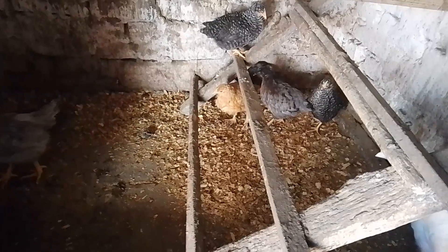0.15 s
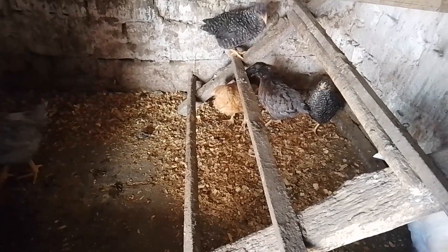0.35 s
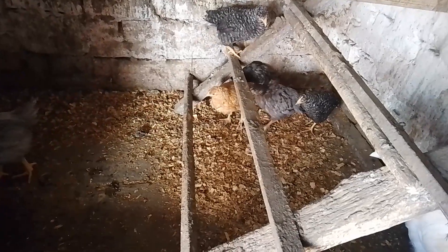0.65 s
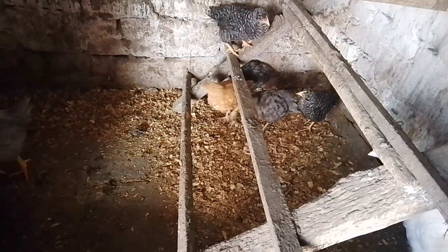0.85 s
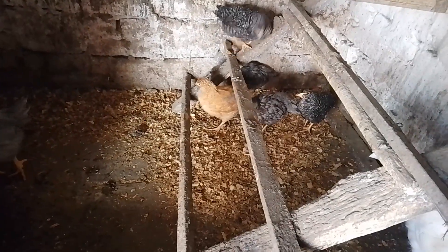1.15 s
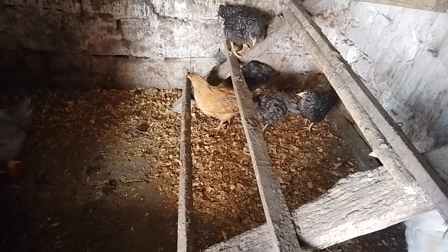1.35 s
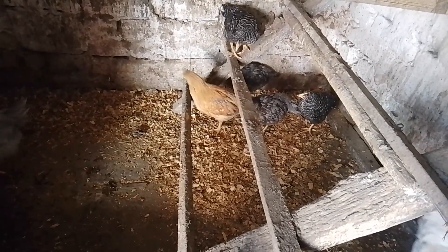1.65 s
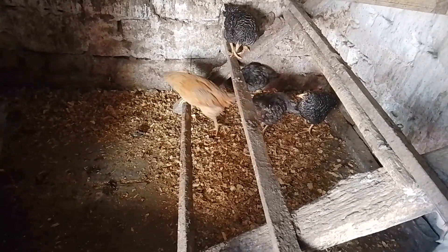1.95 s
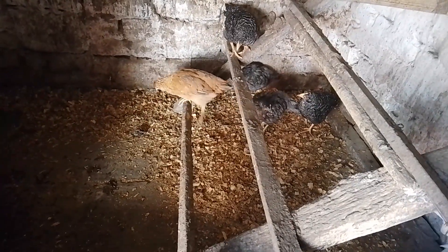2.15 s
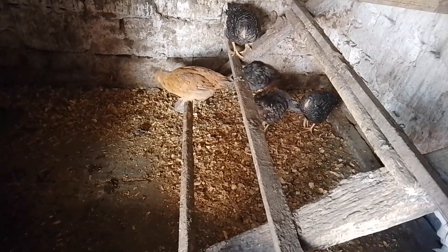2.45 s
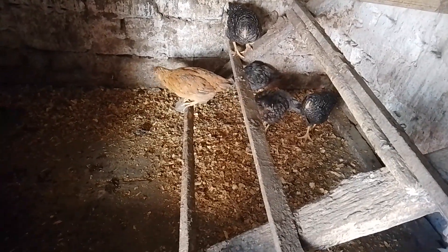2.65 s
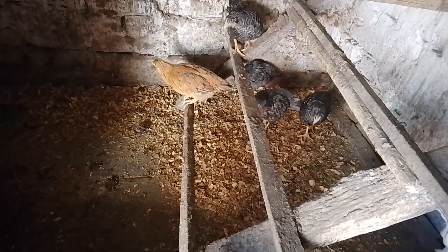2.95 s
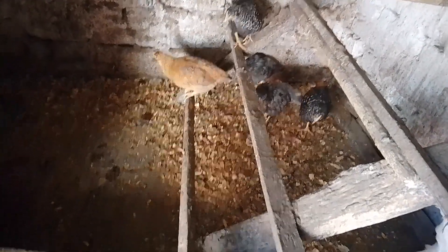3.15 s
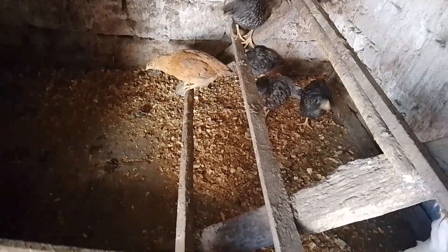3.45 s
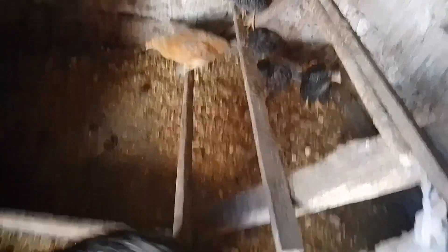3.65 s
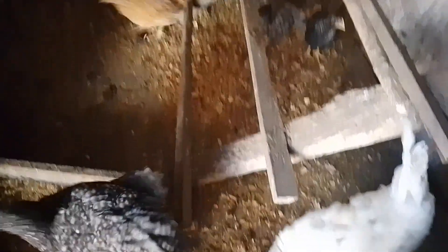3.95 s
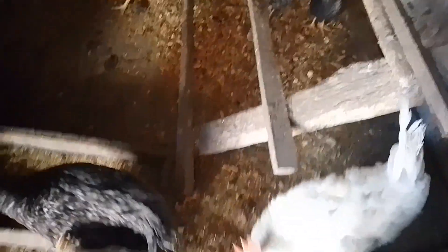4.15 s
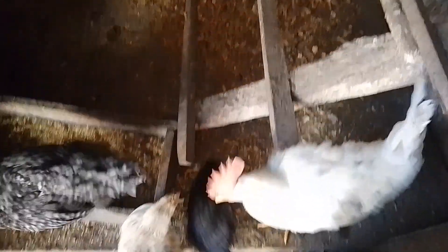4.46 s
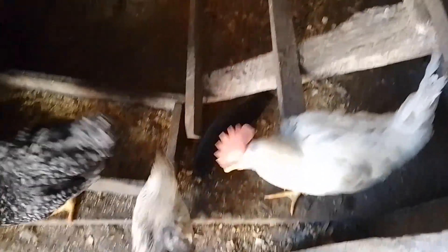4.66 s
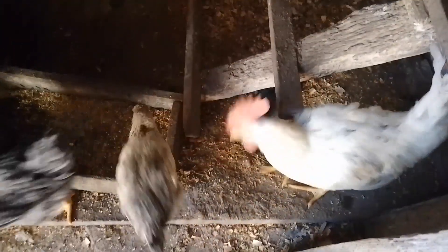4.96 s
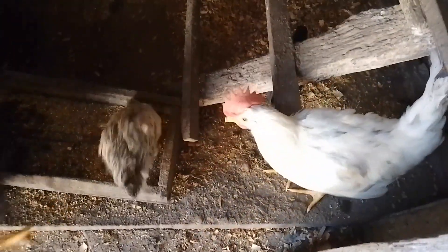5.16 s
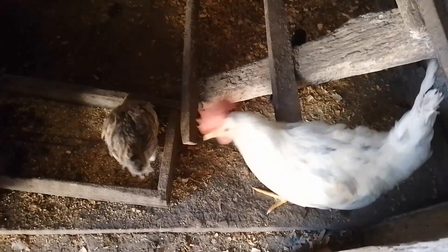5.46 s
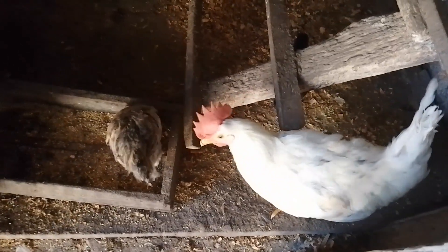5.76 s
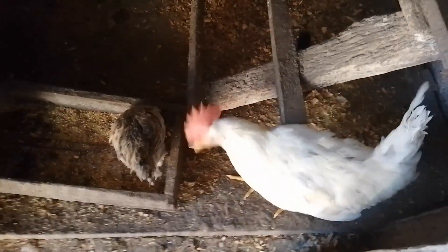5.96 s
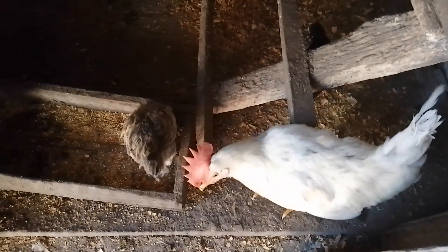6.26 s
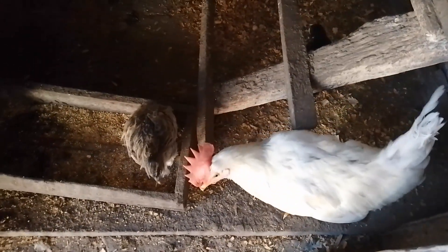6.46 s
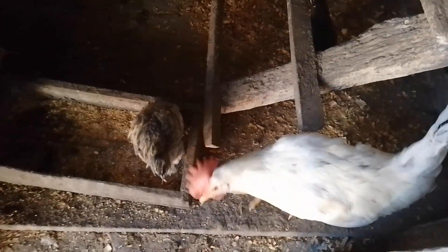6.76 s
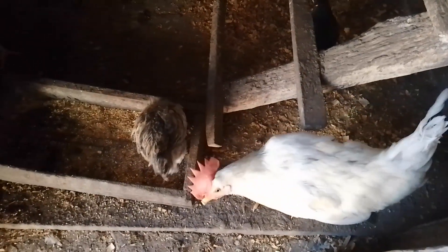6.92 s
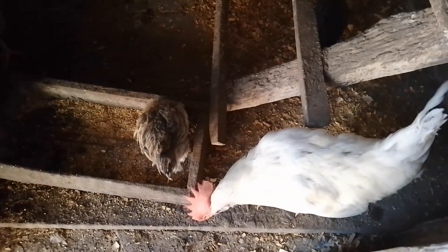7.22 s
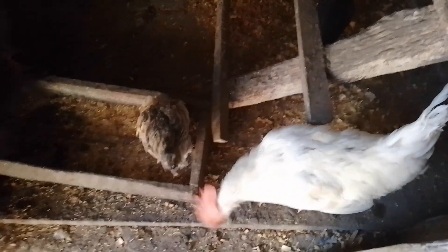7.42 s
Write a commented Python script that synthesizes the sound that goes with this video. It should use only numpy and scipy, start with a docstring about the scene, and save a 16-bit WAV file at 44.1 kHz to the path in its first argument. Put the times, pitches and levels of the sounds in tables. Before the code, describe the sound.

High falling chick peeps over scratching and wooden knocks, while hens brush past with swishing wings and step on a wooden trough.

```python
"""Chicks peep in a small stone coop, with one trill at 0.2 s; each call is a sliding near-sine from the
syrinx. Beaks and feet knock on boards and scratch the litter throughout. From 3.4 s a hen holds a thin
whine while feathers rustle and wings swish as the hens push past. From 4.2 to 4.8 s feet ring a wooden
feed trough and the peeps are loudest. Two hollow bumps come near 5.9 s, then more peeps and scratching,
and a brief high sizzle at 7.5 s."""
import sys
import numpy as np
from scipy import signal
from scipy.fft import rfft, irfft, next_fast_len
from scipy.io import wavfile

SR = 44100
rng = np.random.default_rng(int(sys.argv[2]) if len(sys.argv) > 2 else 0)


def to_wav(sig):
    """Store sig (one row per channel, or 1-D mono) as 16-bit WAV at the path in sys.argv[1].

    Samples outside -1..1 are clipped; the rate is SR.
    """
    pcm = np.clip(np.atleast_2d(sig), -1, 1) * 32767
    pcm = np.round(pcm).astype(np.int16)
    wavfile.write(sys.argv[1], SR, pcm.T)  # frames by channels


N = 334719
TIME = np.arange(N) / SR


def from_db(db):
    """Decibels to gain."""
    return 10 ** (np.asarray(db) / 20)


def unit_rms(x):
    """Scale to unit power."""
    return x / np.sqrt(np.mean(x ** 2) + 1e-20)


def curve(rows):
    """Interpolate (seconds, value) rows at every sample."""
    return np.interp(TIME, *np.transpose(rows))


def band(x, hz, kind, order=2):
    """Butterworth filter."""
    return signal.sosfilt(signal.butter(order, np.clip(hz, 10, .45 * SR), kind, fs=SR, output="sos"), x)


def drift(rate_hz, size):
    """Random wander of unit spread, rate_hz new values a second."""
    steps = rng.standard_normal(size // 16 + 2)
    return np.sqrt(3 / 2) * np.interp(np.arange(size) * rate_hz / SR, np.arange(len(steps)), steps)


def panned(x, pan_db):
    """Mono to stereo; pan_db is left over right."""
    return x * from_db([[pan_db / 2], [-pan_db / 2]])


def add(out, start_s, x):
    """Mix x in at start_s."""
    at = round(start_s * SR)
    out[..., at:at + x.shape[-1]] += x[..., :max(N - at, 0)]


def coloured(x, spectrum):
    """Filter x by (Hz, dB) rows."""
    hz, db = np.transpose(spectrum)
    size = next_fast_len(N + SR // 2)
    bins_hz = np.fft.rfftfreq(size, 1 / SR)
    gain = from_db(np.interp(np.log(bins_hz + 1), np.log(hz), db, left=-90))
    return irfft(rfft(x, size) * gain, size)[..., :N]


def noise(spectrum, width):
    """Coloured stereo noise; width is side over mid."""
    mid, side = band(coloured(rng.standard_normal((2, N)), spectrum), spectrum[-1][0] * 1.2, "low")
    return unit_rms(mid) + width * unit_rms(side) * [[1], [-1]]


# Echoes off walls and floor. Each row: delay in seconds, relative level in dB, pan in dB.
WALL_ECHOES = [(.0031, -12, 18), (.0058, -5, -22.5), (.0094, -5, 6), (0.0135, -24, -21)]


def coop(x, echo_db, tail_db, width, t60_s=0.17, lag_s_per_db=.00003):
    """Echoes off the near walls reach the farther microphone later; a short diffuse tail follows."""
    t = np.arange(SR // 2) / SR
    envelope = from_db(-60 * t / t60_s) * (1 - np.exp(-t / 0.0036))
    mid, side = band(rng.standard_normal((2, len(t))), 5340, "low") * envelope
    response = (mid + width * side * [[1], [-1]]) / np.sqrt(np.sum(mid ** 2)) * from_db(tail_db)
    for delay_s, db, pan_db in WALL_ECHOES:
        for channel, sign in enumerate([1, -1]):
            at = round((delay_s - sign * pan_db * lag_s_per_db / 2) * SR)
            response[channel, at] += from_db(db + echo_db + sign * pan_db / 2)
    return x + signal.fftconvolve(np.atleast_2d(x), response, axes=1)[:, :N]


# Floor rumble. Each row: time in seconds, level in dB before gain.
RUMBLE_LEVELS = [(0.0, -68.5), (0.89, -72), (2.75, -71), (4.44, -60), (4.65, -55), (4.9, -64),
                 (5.79, -67.5), (6.38, -66), (6.64, -63.5), (7.59, -67)]
# Each row: frequency in Hz, density in dB.
RUMBLE_SPECTRUM = [(20, -30), (42, 4), (70, -4.5), (120, 3), (170, -2.5), (300, -24), (700, -52)]


def floor_rumble(gain_db=3.5):
    """The floor rumbles under the birds."""
    return from_db(curve(RUMBLE_LEVELS) + gain_db + 0.5 * drift(12, N)) * noise(RUMBLE_SPECTRUM, width=0.17)


# Closing sizzle. Each row: time in seconds, level in dB.
SIZZLE_LEVELS = [(7.43, -90), (7.49, -61), (7.52, -59), (7.53, -50), (7.59, -58)]
# Each row: frequency in Hz, density in dB.
SIZZLE_SPECTRUM = [(9000, -32), (10500, -10), (11700, 3), (12800, 5), (14000, -19)]


def sizzle():
    """A brief flickering hiss near 12 kHz."""
    envelope = from_db(curve(SIZZLE_LEVELS) + 4.1 * drift(246.6, N)) * (TIME > SIZZLE_LEVELS[0][0])
    return envelope * noise(SIZZLE_SPECTRUM, width=0.11)


# How busy the feet are. Each row: time in seconds, level in dB before gain.
FOOTWORK_LEVELS = [(0.0, -68), (0.63, -65.5), (0.78, -62), (0.93, -65.5), (1.58, -67), (1.82, -66.5),
                   (3.19, -68), (3.63, -60.5), (3.83, -66), (4.12, -57.5), (4.44, -53), (4.65, -48),
                   (4.75, -56), (5.71, -66), (6.32, -64.5), (6.53, -62.5), (6.89, -66.5), (7.59, -65.5)]
# Scuffing feet and cracking litter. Each row: frequency in Hz, density in dB.
SCUFF_SPECTRUM = [(150, 1), (250, 10), (400, 3), (560, 4), (800, 1), (1500, -2), (2500, -5), (5000, -27.5),
                  (9000, -20)]
CRACK_SPECTRUM = [(300, -12), (700, 3), (1600, -1), (3000, -3), (6000, 3), (14000, -28)]


def footwork(scuff_gain_db=1, crack_gain_db=-2.5, crack_t60_s=0.048):
    """Feet scuff; straw and grain give way in tiny dry cracks, more often as the feet get busier."""
    feet_db = curve(FOOTWORK_LEVELS)
    scuffs = from_db(feet_db + scuff_gain_db + 2 * drift(90, N)) * noise(SCUFF_SPECTRUM, width=0.56)
    cracks_per_s = 34 * from_db(feet_db + 63)
    onsets = rng.random(N) < cracks_per_s / SR
    sizes = from_db(feet_db + crack_gain_db + 3 * np.clip(rng.standard_normal(N), -2, 2))
    envelope = signal.lfilter([1], [1, -from_db(-60 / (crack_t60_s * SR))], onsets * sizes + 1e-18)
    return scuffs + envelope * noise(CRACK_SPECTRUM, width=0.96)


# Feathers brushing. Each row: time in seconds, level in dB before gain.
RUSTLE_LEVELS = [(0.0, -73.5), (0.19, -69.5), (0.38, -75), (0.59, -79), (0.76, -68), (1.54, -82),
                 (2.07, -78), (2.54, -88), (3.68, -72.5), (3.87, -56), (4.27, -64.5), (4.59, -59),
                 (4.99, -75.5), (5.62, -82), (6.19, -80), (6.57, -64), (6.89, -81), (7.59, -83)]
# Wing passes. Each row: peak time in seconds, half length in seconds, level in dB.
WING_PASSES = [(3.75, 0.093, -53.5), (3.94, 0.084, -52), (4.104, 0.2, -68.5), (4.672, 0.075, -55),
               (6.584, 0.27, -62.5)]
# Rustle and swish. Each row: frequency in Hz, density in dB.
RUSTLE_SPECTRUM = [(1200, -14), (2500, 1.5), (4000, 9.5), (6000, 11), (7500, 2.5), (10000, -3.5),
                   (14000, -9)]
SWISH_SPECTRUM = [(3000, 7), (7000, -4), (11000, 5.5), (14000, 8.5)]


def feathers(rustle_gain_db=7.5, hiss_db=-74.5):
    """Feathers rustle, more unevenly when busy; wings slide past over a faint high hiss."""
    rustle_db = curve(RUSTLE_LEVELS)
    unevenness = np.interp(rustle_db, [-81, -67], [.3, 1])
    gust_db = unevenness * (2.9 * drift(30, N) + 1.24 * drift(330, N))
    rustle = from_db(rustle_db + rustle_gain_db + gust_db) * noise(RUSTLE_SPECTRUM, width=0.49)
    wings = sum(from_db(db) * np.maximum(1 - ((TIME - peak_s) / half_s) ** 2, 0)
                for peak_s, half_s, db in WING_PASSES)
    swish = (from_db(hiss_db) + wings) * from_db(gust_db / 2) * noise(SWISH_SPECTRUM, width=0.59)
    return rustle + swish


# Strokes in the litter. Each row: start in seconds, level in dB, T60 in seconds.
SCRATCH_STROKES = [(.008, -57.5, .2), (.21, -61, 0.76), (.583, -53, 0.27), (1.067, -55, 0.15),
                   (2.024, -64.5, 0.12), (2.541, -51.5, 0.031), (3.05, -60, 0.059), (4.39, -42.5, 0.41),
                   (4.485, -43.5, 0.17), (4.694, -44, .08), (4.89, -50, 0.28), (5.061, -58, 0.3),
                   (5.228, -48.5, 0.28), (5.36, -64.5, 0.15), (5.594, -56.5, 0.053), (5.943, -49, 0.15),
                   (6.351, -48.5, 0.18), (6.396, -40, 0.06), (6.573, -46.5, 0.42), (6.724, -59, 0.096),
                   (6.858, -58.5, 0.15)]


def scratches(swell_s=0.0066, crunch_db=3.5):
    """Claws and beaks crunch through straw and grain."""
    force, t = np.zeros(N), np.arange(SR // 2) / SR
    attack = np.minimum(t / swell_s, 1)
    for start_s, db, t60_s in SCRATCH_STROKES:
        add(force, start_s, attack * from_db(db - 60 * np.maximum(t - swell_s, 0) / t60_s))
    hiss = band(rng.standard_normal(N), [3000, 7000], "band", order=1)
    return force * unit_rms(hiss * from_db(-crunch_db * drift(700, N)))


def ring_modes(blows, modes):
    """A soft foot feeds the modes for as long as the contact lasts; then they ring out."""
    out, t = np.zeros(N), np.arange(SR // 2) / SR
    for start_s, db, contact_s, overtone_db in blows:
        for k, (hz, mode_db, t60_s) in enumerate(modes):
            envelope = np.minimum(t / contact_s, 1) * from_db(-60 * np.maximum(t - contact_s, 0) / t60_s)
            gain = from_db(db + mode_db + overtone_db * (k > 0))
            add(out, start_s, gain * envelope * np.sin(2 * np.pi * hz * t))
    return out


# Hollow bumps. Each row: start in seconds, level in dB, contact in seconds, overtone gain in dB.
BUMP_BLOWS = [(5.853, -45.5, 0.016, -3.5), (5.908, -39.5, 0.0091, -9)]
# Each row: frequency in Hz, gain in dB, T60 in seconds.
BUMP_MODES = [(115, 6.5, 0.24), (150.5, 11, 0.15), (223, -3, 0.23)]


def bumps():
    """Two soft blows ring low, hollow modes."""
    return ring_modes(BUMP_BLOWS, BUMP_MODES)


# Knocks on boards. Each row: start in seconds, level in dB, centre in Hz, rattle T60 in seconds.
BOARD_KNOCKS = [(0.118, -38, 466, 0.26), (0.651, -47.5, 710, 0.27), (.775, -52, 674, 0.59),
                (1.602, -45.5, 566, 0.23), (1.744, -52, 880, 0.021), (1.885, -50, 1110, 0.054),
                (1.9, -48.5, 497, 0.13), (1.955, -50.5, 724, 0.027), (2.024, -63, 1330, 0.17),
                (2.167, -44, 367, 0.19), (2.276, -51.5, 267, 0.084), (2.546, -36, 381, 0.17),
                (2.716, -46.5, 760, 0.044), (2.812, -49.5, 263, 0.23), (3.179, -39.5, 380, 0.14),
                (3.379, -32.5, 686, 0.064), (3.51, -34.5, 464, 0.13), (3.58, -38.5, 578, 0.076),
                (3.751, -45, 653, 1), (4.461, -31, 684, 0.021), (4.659, -44, 745, .27),
                (4.699, -40.5, 128, 0.35), (4.93, -39.5, 202, 0.3), (4.944, -37, 614, 0.043),
                (5.061, -46.5, 690, 0.33), (5.233, -32.5, 644, 0.13), (5.262, -37, 620, 0.12),
                (5.361, -50.5, 950, 0.071), (5.429, -42, 320, .4), (6.339, -55.5, 1135, 0.69),
                (6.598, -44.5, 280, 0.75), (6.866, -48.5, 316, 0.53), (7.329, -66.5, 1430, 0.35)]
# Each row: frequency in Hz, gain in dB, T60 in seconds.
BOARD_MODES = [(219, 4.5, 0.082), (474, 0.5, 0.071), (567.5, 1.5, 0.082), (676, -8.5, 0.12),
               (883, -3, 0.07), (1114, -2, 0.069), (1326, -16, 0.088)]
# Harder contacts are higher and grittier. Each row: knock centre in Hz, grit gain in dB.
GRIT_BY_PITCH = [(260, -32), (390, -13), (650, -8), (1200, 6.5)]


def knocks(tap_db=-3, ring_db=-2, thud_db=-10, spread_octaves=0.56):
    """A blow gives one pressure swing, then rings the board modes near its pitch, with grit on top."""
    out, t = np.zeros(N), np.arange(SR // 2) / SR
    for start_s, db, hz, t60_s in BOARD_KNOCKS:
        tap = -2 * np.sin(2 * np.pi * hz * t) * np.exp(-(hz * t - .8) ** 2 / .5)
        ring = np.zeros(len(t))
        for k, (mode_hz, mode_db, mode_t60_s) in enumerate(BOARD_MODES):
            coupling = (-1) ** k * np.exp(-(np.log2(mode_hz / hz) / spread_octaves) ** 2 / 2)
            ring += coupling * from_db(mode_db - 60 * t / mode_t60_s) * np.sin(2 * np.pi * mode_hz * t)
        thud = unit_rms(band(rng.standard_normal(len(t)), [hz * 0.698, hz * 1.032], "band"))
        grit = band(rng.standard_normal(len(t)), [800, 2000], "band", order=1)
        grit = unit_rms(band(grit, 2400, "low"))
        grit_db = np.interp(hz, *np.transpose(GRIT_BY_PITCH))
        envelope = from_db(-60 * t / t60_s) * (1 - np.exp(-t / 0.00092))
        rattle = envelope * (from_db(thud_db) * thud + from_db(grit_db) * grit)
        add(out, start_s, from_db(db) * (from_db(tap_db) * tap + from_db(ring_db) * ring + rattle))
    return out


# Feet on the trough. Each row: start in seconds, level in dB, contact in seconds, overtone gain in dB.
TROUGH_STEPS = [(4.208, -46, 0.0071, -4), (4.285, -55.5, 0.091, -23), (4.463, -25.5, 0.0088, -25),
                (4.555, -27.5, 0.0078, -3), (4.615, -21, 0.0065, -5), (4.655, -38.5, 0.031, -4),
                (4.8, -28, 0.011, -24.5)]
# The plank bends like a free bar. Each row: frequency in Hz, gain in dB, T60 in seconds.
PLANK_MODES = [(534.7, 1.5, 0.065), (1442, -4, 0.041), (1980, -11, 0.029)]
# Loose boards under a dragging foot. Each row: frequency in Hz, density in dB.
CHATTER_SPECTRUM = [(150, -39), (330, -12), (560, 7), (800, 7.5), (1100, -8), (1450, -1), (2000, -14),
                    (4000, -16)]


def trough(chatter_db=-12, chatter_t60_s=.2):
    """Each step rings the plank and sets the loose boards chattering."""
    force, t = np.zeros(N), np.arange(SR // 2) / SR
    for start_s, db, contact_s, overtone_db in TROUGH_STEPS:
        attack = np.minimum(t / contact_s, 1)
        add(force, start_s, attack * from_db(db + overtone_db / 3 - 60 * t / chatter_t60_s))
    chatter = force * from_db(chatter_db + 3.9 * drift(410, N)) * noise(CHATTER_SPECTRUM, width=0.51)
    return ring_modes(TROUGH_STEPS, PLANK_MODES) + chatter


# The hen's whine. Each row: time in seconds, level in dB.
WHINE_LEVELS = [(3.386, -56), (3.405, -47), (3.455, -38), (3.51, -62), (3.68, -55.5), (3.8, -59.5),
                (4.16, -48), (4.193, -38.5), (4.234, -83)]


def hen(pitch_hz=1375, sag_hz_per_s=55, drop_s=0.0633, drop_hz_per_s=3300):
    """A thin note through a closed beak: it settles from above, sags slowly and drops at the end."""
    start_s, end_s = WHINE_LEVELS[0][0], WHINE_LEVELS[-1][0]
    t = np.clip(TIME, start_s, end_s) - start_s
    settle_hz = 220 * np.exp(-t / 0.0267)
    drop_hz = drop_hz_per_s * np.maximum(t - (end_s - start_s - drop_s), 0)
    hz = pitch_hz + settle_hz - sag_hz_per_s * t - drop_hz
    phase = 2 * np.pi * np.cumsum(hz * (1 + 0.011 * drift(200, N))) / SR
    sounding = (TIME > start_s) & (TIME < end_s)
    envelope = sounding * from_db(curve(WHINE_LEVELS) + 0.95 * drift(80, N))
    return envelope * (np.sin(phase) + from_db(-36) * np.sin(2 * phase))


def syrinx(swell_s, fade_s, start_hz, loud_hz, end_hz, rough, octave_db=-23, rasp_db=-17):
    """One chick note: a sliding near-sine, faint at first; an unsteady membrane makes it rasp."""
    length_s = swell_s + fade_s
    t = np.arange(int(length_s * SR)) / SR
    fall_hz = max(start_hz - loud_hz, 0)
    scoop_hz = 0.8 * fall_hz * np.exp(-t / 0.007)
    hz = np.interp(t, [swell_s * .25, swell_s, length_s], [start_hz, loud_hz, end_hz]) - scoop_hz
    jitter = 0.0985 * rough * drift(700, SR)[:len(t)]
    phase = 2 * np.pi * np.cumsum(hz * (1 + jitter)) / SR
    # The further the fall, the fainter the start before the voice breaks through.
    lead_in = np.interp(fall_hz, [200, 1200], [.65, .24])
    knots_s = [0, swell_s * .15, swell_s * .7, swell_s * .78,
               swell_s + fade_s * .2, swell_s + fade_s * .6, length_s]
    push = np.interp(t, knots_s, [0, lead_in, lead_in * 1.3, 1, 1, .4, 0])
    flutter = from_db(4.5 * np.sqrt(rough) * (drift(300.3, SR)[:len(t)] - 2))
    # The octave comes under a hard push, unevenly.
    octave_gain = from_db(octave_db + 2.8 * drift(148, SR)[:len(t)]) * (1 + 3 * rough) * push
    hiss = band(rng.standard_normal(SR), [2400, 7000], "band")[:len(t)]
    rasp = from_db(rasp_db) * rough * hiss * 2 * (1 + np.sin(phase))
    return push * flutter * (np.sin(phase) + octave_gain * np.sin(2 * phase) + rasp)


# Soft notes. Each row: start in seconds, length in seconds, pitch in Hz, glide in Hz per second,
# level in dB, roughness 0-1, pan in dB.
WHIMPER_NOTES = [ (0.179, 0.052, 4250, -9000, -46.5, 0.23, 10),
                 (0.213, 0.136, 3950, 1200, -44.5, 0.47, 5.5),
                 (1.024, 0.081, 2238, -4000, -54.5, 0.11, -14), (1.068, 0.21, 1940, -400, -55, 0.13, 2),
                 (1.075, 0.2, 1543, 1504, -55, 0.68, 5), (1.108, 0.051, 2648, 3300, -50.5, 0.06, 4),
                 (1.214, 0.047, 1666, -200, -46, .07, 3), (1.234, 0.24, 2156, 95, -56, 0.42, -2),
                 (1.571, 0.39, 2500, 299, -56, 0.38, 3), (1.668, 0.099, 1880, 2300, -60.5, 0.12, 0),
                 (1.793, .13, 2675, 3803, -50, 0.19, 3), (3.605, 0.14, 4895, -600, -49.5, 0.19, 10),
                 (3.609, 0.041, 3550, -8000, -41, 0.56, 3.5), (3.645, 0.048, 2658, -1500, -41, 0.29, 0.5),
                 (3.812, 0.04, 2640, 30000, -34.5, 0.32, 3), (5.53, 0.109, 1817, 1400, -57, 0.9, 7)]


def whimpers(swell_share=.38):
    """Soft held chick notes, each gliding up or down."""
    for start_s, length_s, hz, glide_hz_per_s, db, rough, pan_db in WHIMPER_NOTES:
        swell_s = length_s * swell_share
        fade_s = length_s - swell_s
        start_hz, end_hz = hz - glide_hz_per_s * swell_s, hz + glide_hz_per_s * fade_s
        yield start_s, db, pan_db, syrinx(swell_s, fade_s, start_hz, hz, end_hz, rough)


def trill(start_s=.205, notes_per_s=38, hz=2920, dip_hz=377, peak_db=-35, pan_db=1.2):
    """Five short even notes, each dipping in pitch; the run swells, then tapers."""
    for k in range(5):
        note = syrinx(0.0074, 0.018, hz + dip_hz, hz, hz, rough=0.556, octave_db=-15.5)
        yield start_s + k / notes_per_s, peak_db - 1.5 * (k - 1.4) ** 2, pan_db, note


# Falling peeps. Each row: start, swell and fade in seconds, pitch at the loudest in Hz,
# level in dB, roughness 0-1, pan in dB.
PEEP_NOTES = [ (0.061, 0.046, 0.019, 2966, -38.5, 0.17, 0.5), (0.352, 0.03, 0.053, 3140, -42, 0.6, 3),
              (0.387, 0.0074, 0.038, 2407, -43.5, 0.11, 5), (.662, .052, .056, 3410, -36.5, 0.35, -1.5),
              (.765, .023, 0.038, 2527, -36.5, 0.41, 1.5), (0.828, 0.043, 0.041, 3376, -28, 0.37, 5),
              (.893, 0.03, 0.029, 2610, -39, 0.65, -2.5), (1.279, 0.032, 0.062, 3245, -35.5, 0.25, 0.5),
              (1.427, 0.053, 0.036, 3240, -37, 0.26, -0.5), (2.503, 0.026, 0.062, 2890, -43, 0.97, 5.5),
              (2.773, 0.045, 0.039, 3236, -40, 0.25, -1), (2.931, .018, 0.018, 3450, -45.5, 0.18, 3),
              (2.949, 0.051, .03, 3300, -37, 0.2, 0.5), (3.15, 0.051, 0.033, 3447, -36, 0.28, 3),
              (3.189, 0.058, .07, 3480, -38.5, 0.35, 1), (3.329, 0.067, 0.085, 2925, -40.5, 0.81, 2),
              (3.375, 0.049, 0.068, 3703, -40, 0.44, 2.5), (3.859, 0.018, 0.068, 2573, -41, 0.65, 3.5),
              (3.924, 0.04, 0.024, 2840, -30, .85, 2), (4.073, 0.041, 0.042, 2455, -43.5, 0.22, 1.5),
              (4.141, .072, 0.033, 3064, -33, 0.68, 2.5), (4.36, 0.05, 0.069, 2864, -27.5, 0.87, 5.5),
              (4.452, 0.028, 0.057, 3017, -25, 0.63, 0.5), (4.788, 0.035, 0.0354, 2784, -30.5, 0.42, 4),
              (4.85, 0.023, 0.092, 3450, -33.5, 0.73, 5), (5.683, .038, 0.038, 2624, -43.5, 0.54, -0.5),
              (5.852, 0.045, 0.081, 3210, -42, 0.42, -0.5), (6.124, 0.033, 0.038, 2910, -38.5, 0.14, -4.5),
              (6.174, 0.032, .017, 3150, -42.5, 0.37, -1), (6.38, 0.054, 0.11, 3132, -37.5, 0.29, 1.5),
              (6.444, 0.038, 0.02, 3235, -35, 0.4, -2.5), (6.555, 0.039, 0.073, 3737, -38, 0.19, 3.5),
              (6.588, 0.025, .011, 2470, -39.5, 0.3, 1.5), (7.335, 0.028, 0.023, 2460, -51, 0.12, 2),
              (7.538, 0.027, 0.026, 2887, -40.5, 0.71, 2.5)]


def peeps(rest_hz=1967, fall_share=.68, max_fall_hz_per_s=31000):
    """Each peep slides down toward a resting pitch; long ones slide more slowly."""
    for start_s, swell_s, fade_s, hz, db, rough, pan_db in PEEP_NOTES:
        fall_hz_per_s = min(fall_share * hz / (swell_s + fade_s), max_fall_hz_per_s)
        start_hz = hz + fall_hz_per_s * swell_s
        end_hz = rest_hz + 0.2174 * (hz - rest_hz)
        yield start_s, db, pan_db, syrinx(swell_s, fade_s, start_hz, hz, end_hz, rough)


# A chick's throat and open beak. Each row: frequency in Hz, gain in dB.
THROAT_RESPONSE = [(900, -1.5), (1500, 13.5), (3000, 1.5), (3600, 3), (4200, 2), (4900, 4), (6200, 6.5),
                   (7200, -2.5), (9000, 3), (14000, 4)]


def chicks(lag_s_per_db=.00002):
    """Throat and beak shape each call; it reaches the farther microphone later."""
    out = np.zeros((2, N))
    for start_s, db, pan_db, call in [*peeps(), *whimpers(), *trill()]:
        left, right = panned(from_db(db) * call, pan_db)
        add(out[0], start_s, left)
        add(out[1], start_s + pan_db * lag_s_per_db, right)
    return coloured(out, THROAT_RESPONSE)


def scene():
    """Voices and scratches spread widely; the low wooden sounds stay near the middle."""
    bright = coop(chicks() + hen() + scratches(), echo_db=-7, tail_db=-7, width=0.99)
    wood = coop(knocks() + trough(), echo_db=-12.5, tail_db=-5.5, width=0.45)
    background = feathers() + footwork() + floor_rumble() + sizzle()
    return background + bumps() + panned(wood, 1.5) + bright


def record(dry):
    """Steep low-pass at 14.25 kHz."""
    return signal.sosfilt(signal.ellip(12, .1, 80, 14250, fs=SR, output="sos"), dry)


dry = scene()
out = record(dry)
to_wav(out)
```